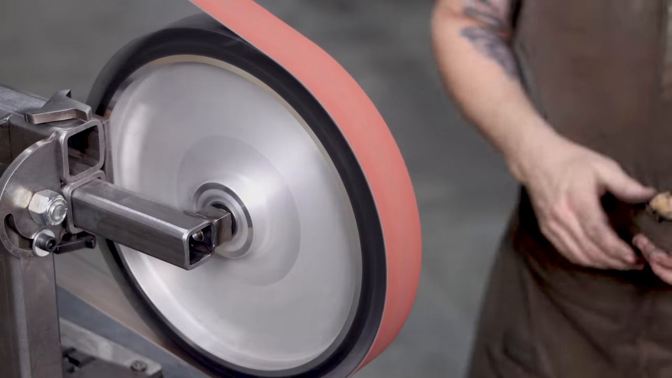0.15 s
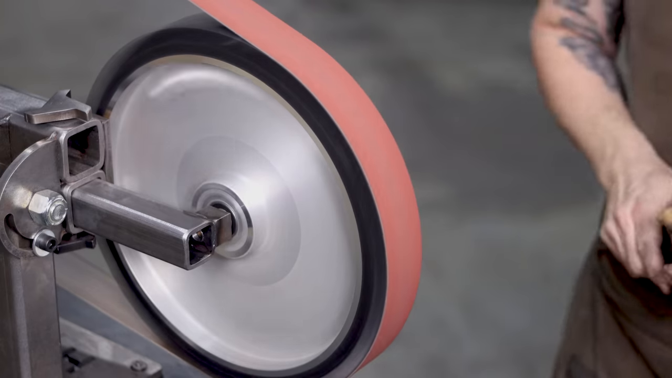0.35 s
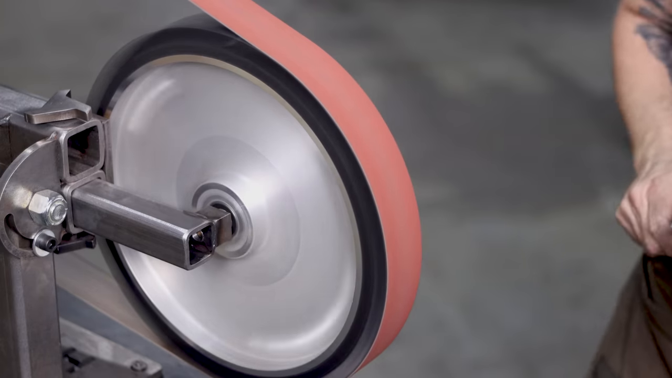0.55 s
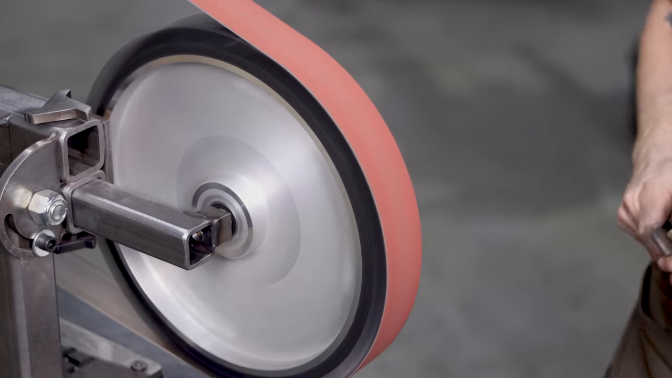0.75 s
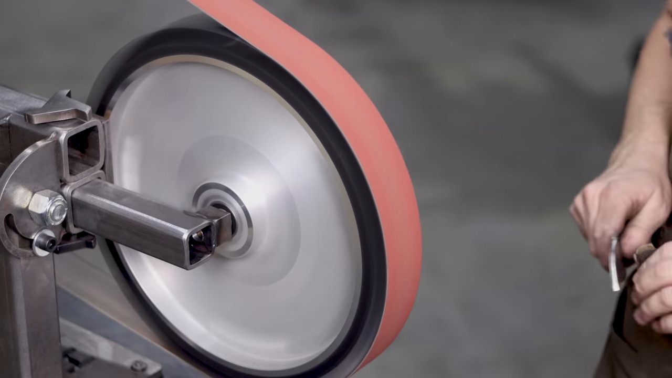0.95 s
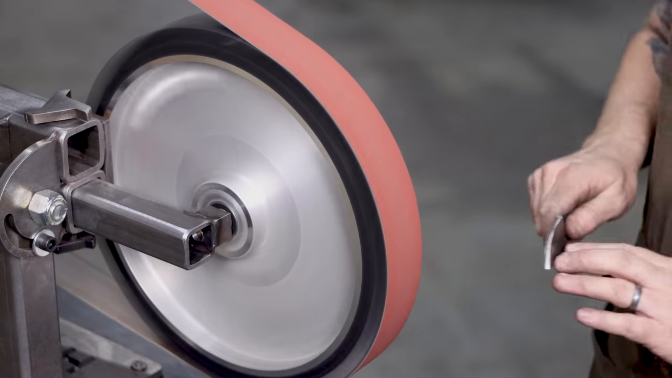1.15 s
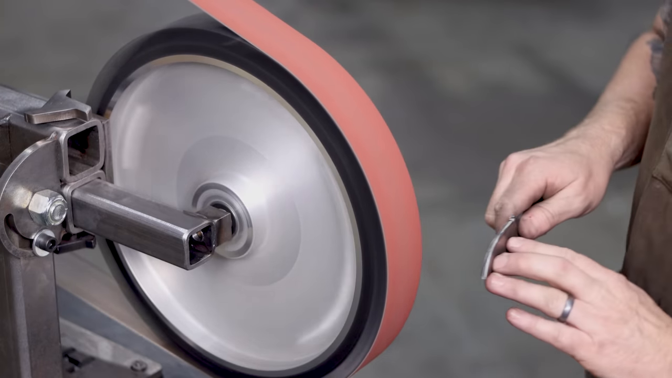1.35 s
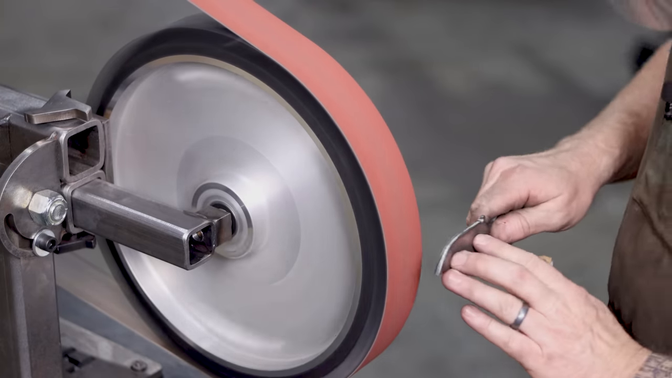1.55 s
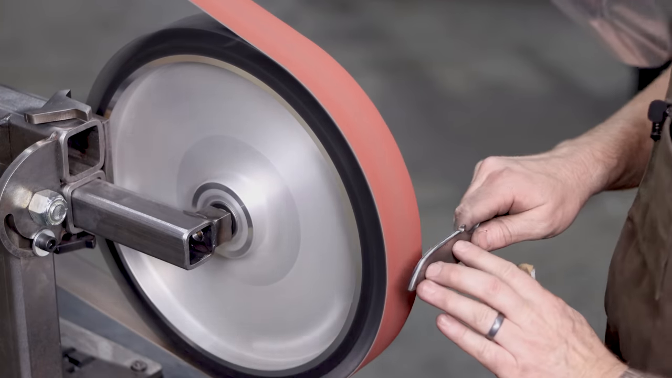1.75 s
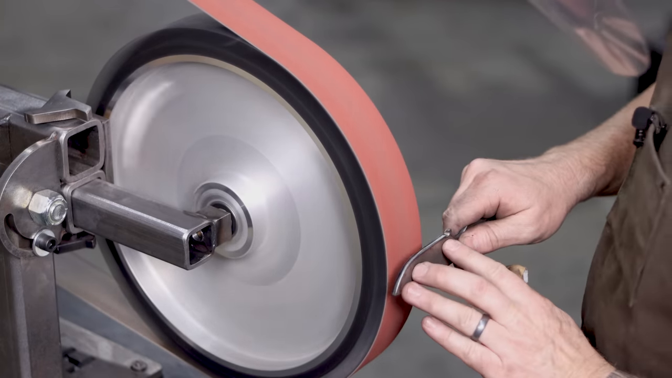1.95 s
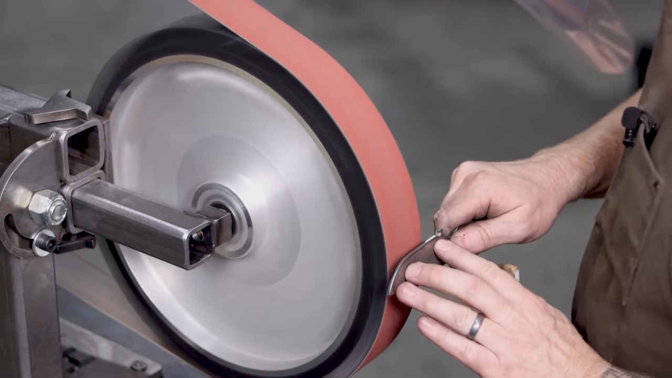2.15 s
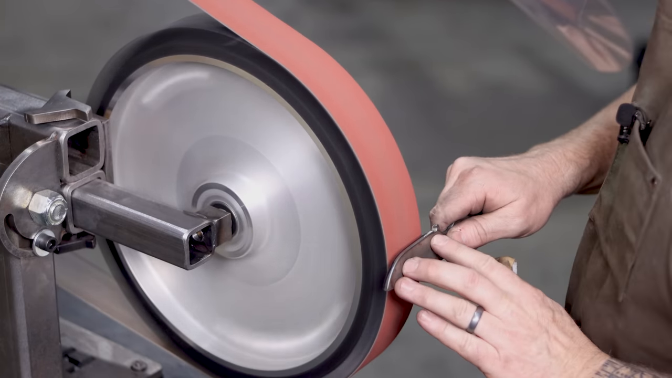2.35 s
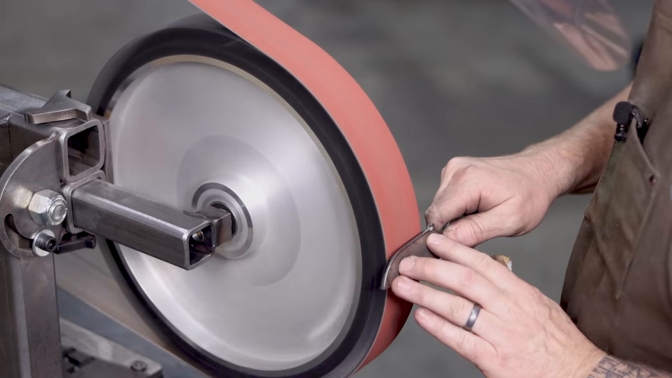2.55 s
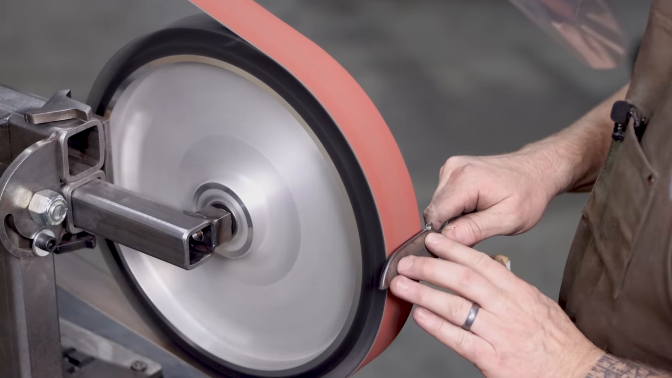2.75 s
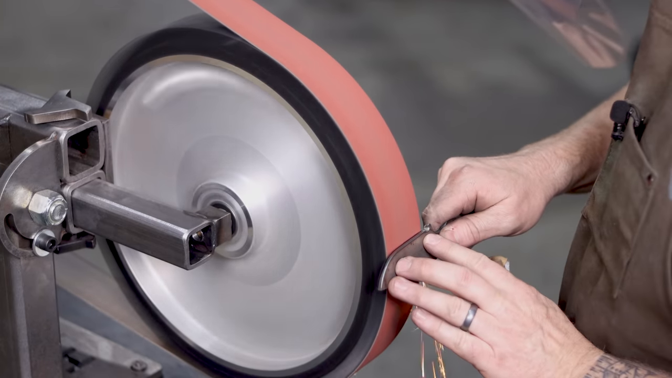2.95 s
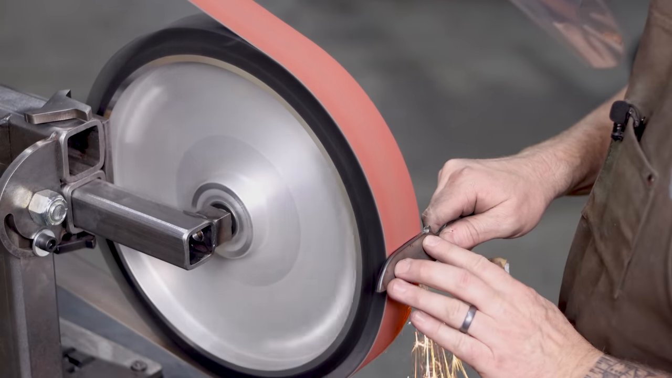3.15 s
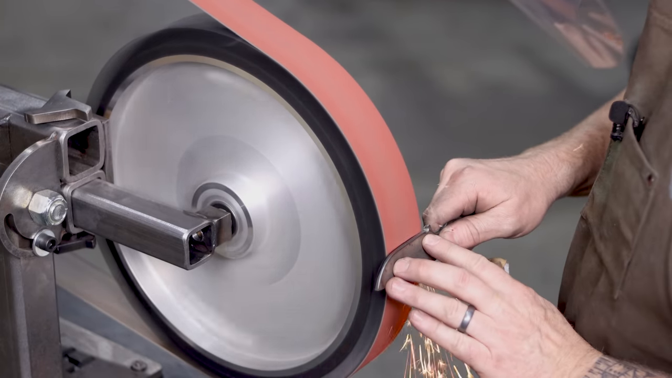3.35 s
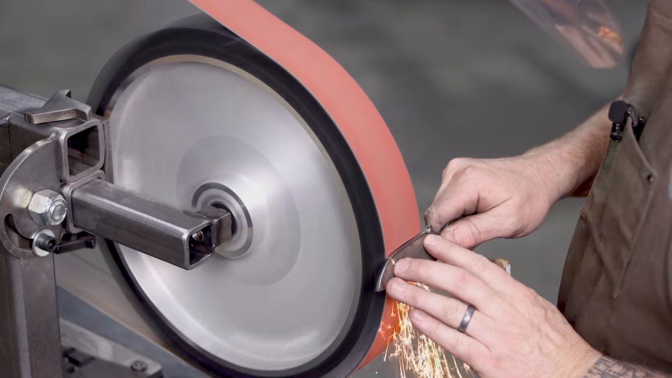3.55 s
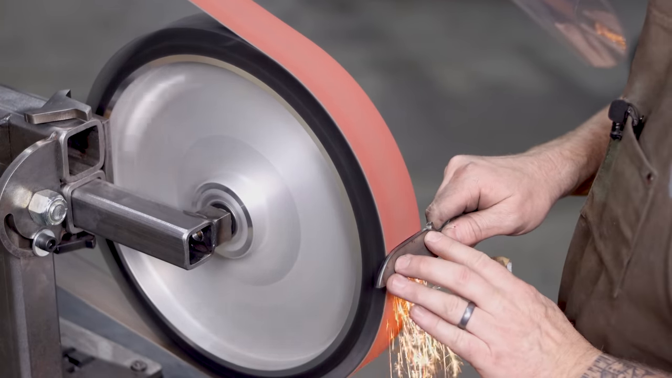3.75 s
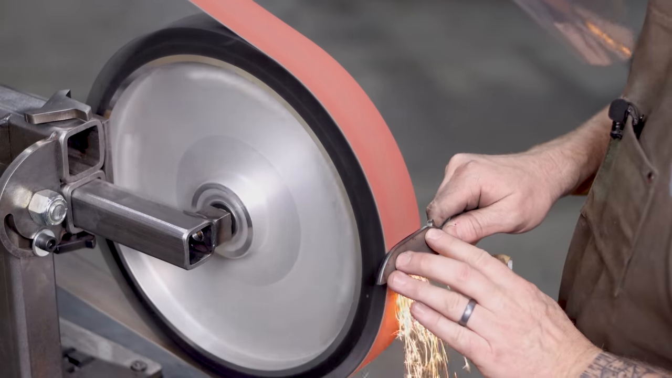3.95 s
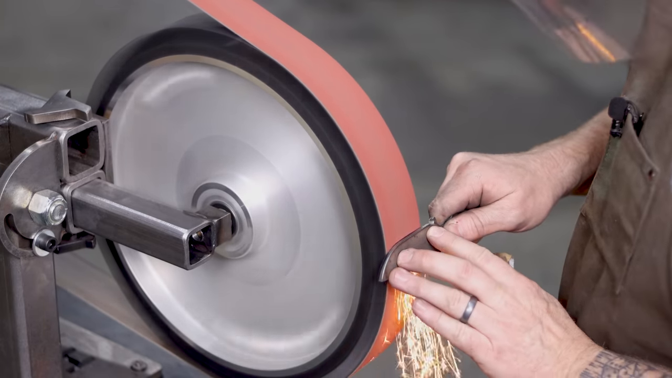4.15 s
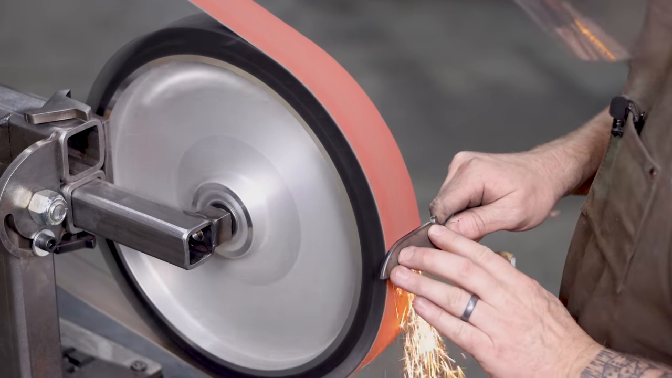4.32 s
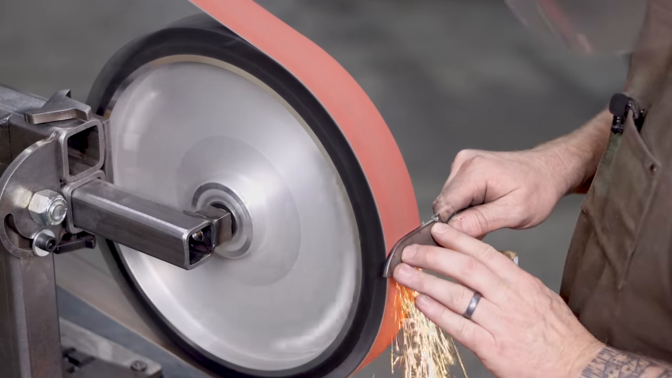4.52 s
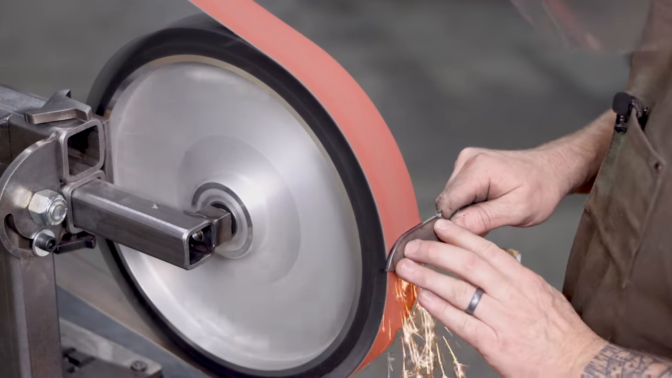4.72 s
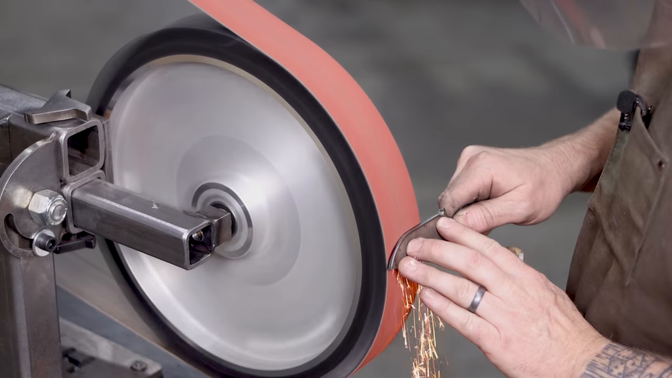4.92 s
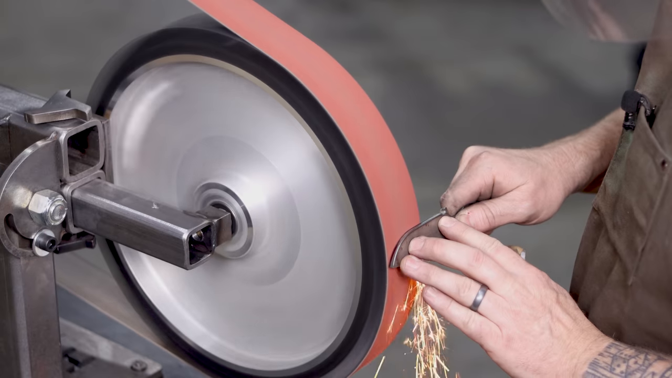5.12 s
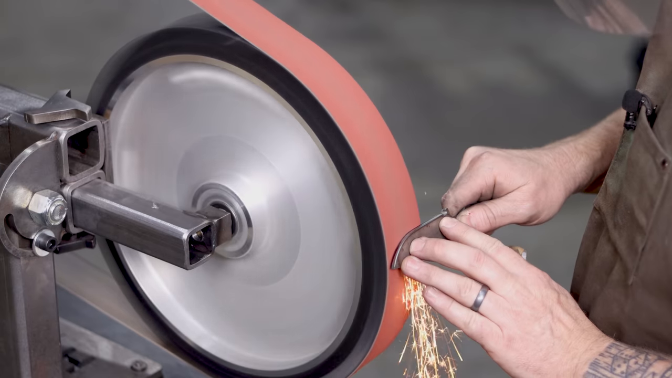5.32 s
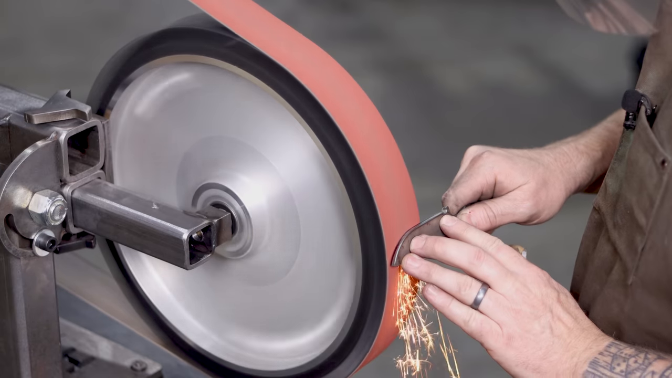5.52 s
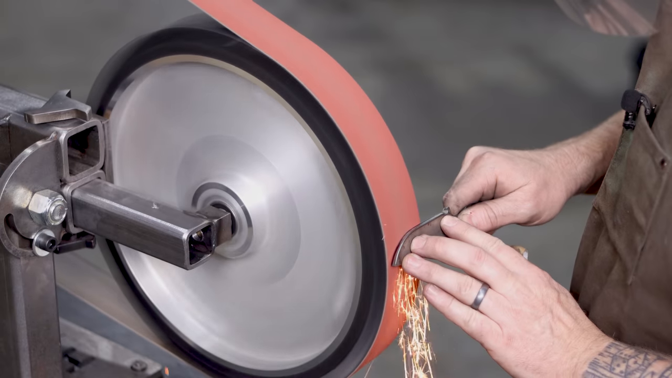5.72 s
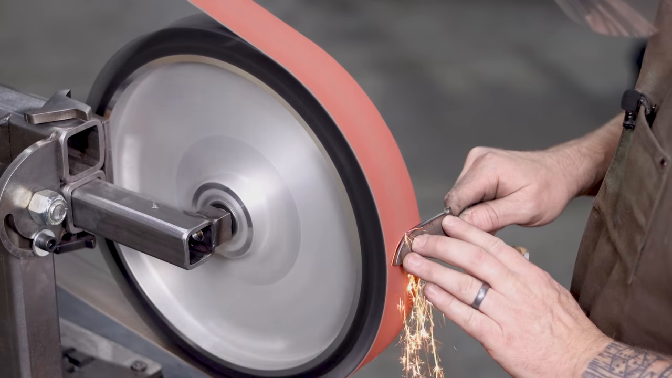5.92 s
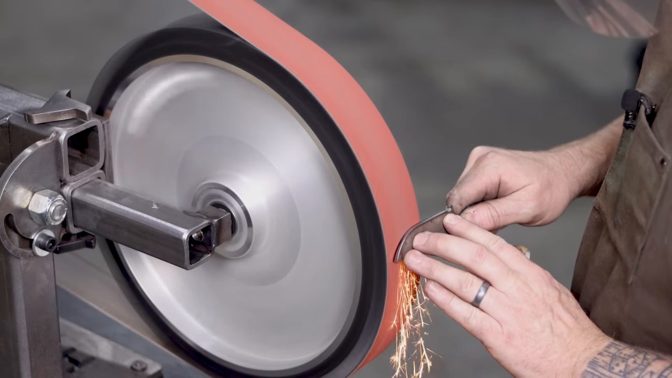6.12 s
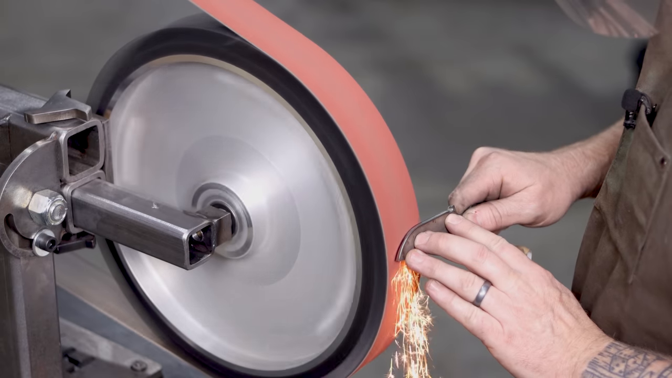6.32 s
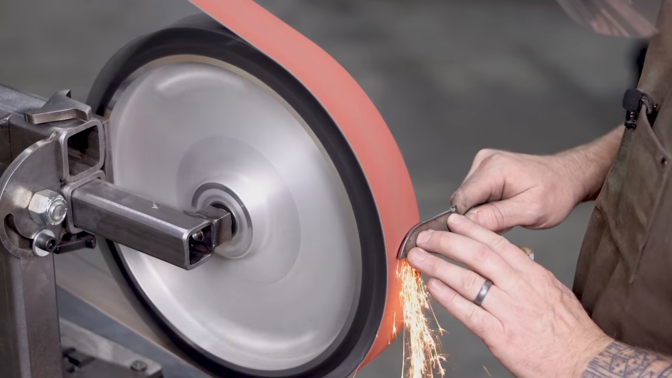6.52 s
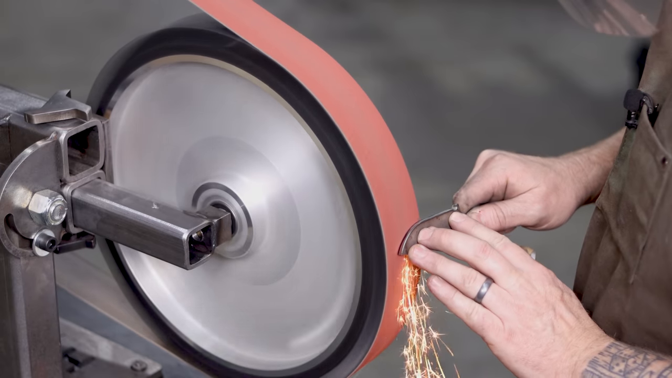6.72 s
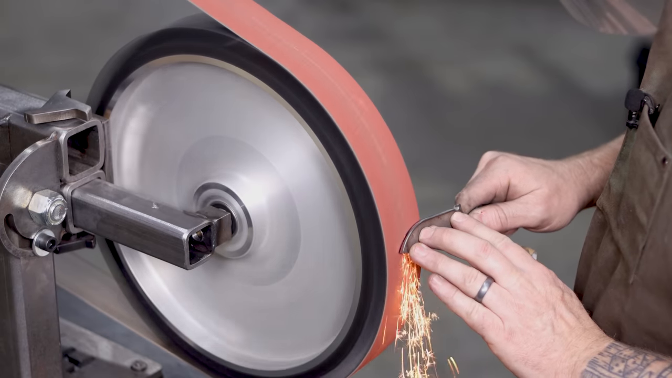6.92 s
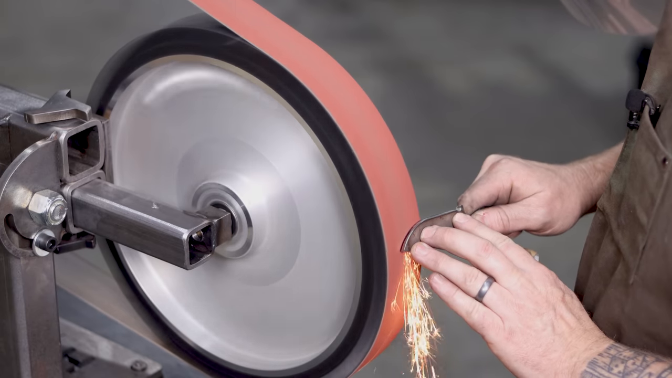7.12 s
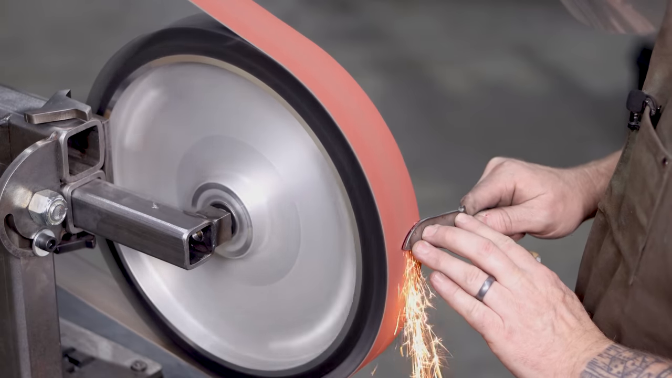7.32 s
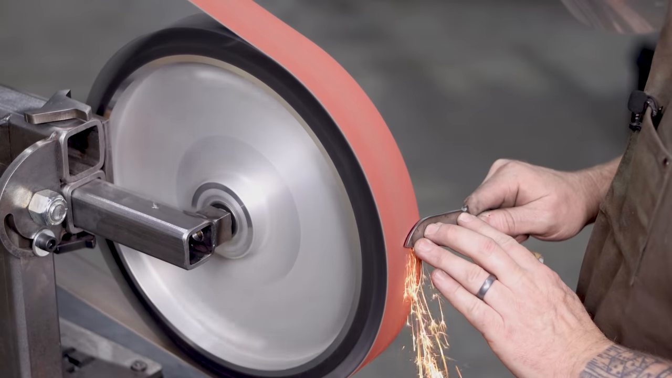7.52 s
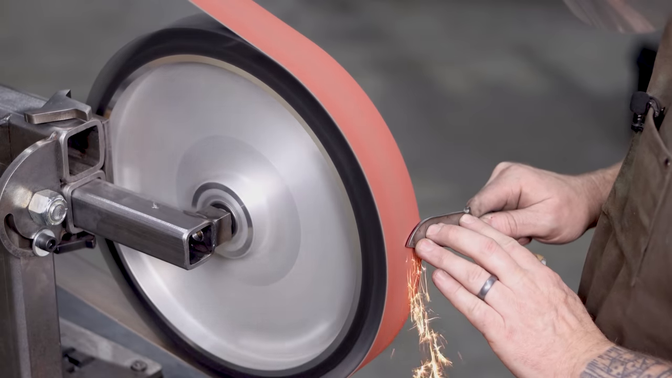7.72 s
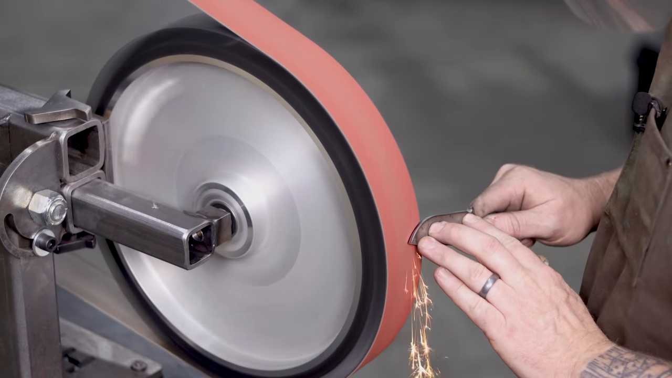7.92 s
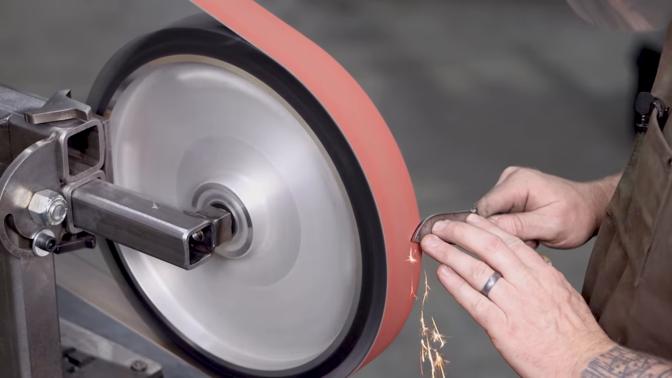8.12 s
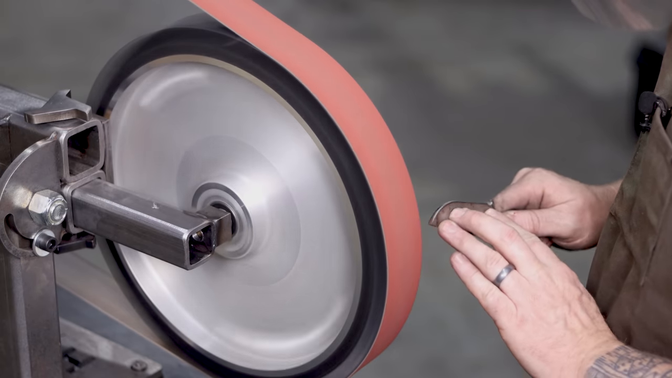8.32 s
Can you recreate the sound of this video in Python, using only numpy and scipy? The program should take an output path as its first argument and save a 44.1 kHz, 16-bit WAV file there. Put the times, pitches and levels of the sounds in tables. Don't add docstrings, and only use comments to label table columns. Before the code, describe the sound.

Close to a spinning grinding belt: steady high whine and gritty hiss, then a harsh metallic rasp surges, eases, sustains and abruptly skips away.

```python
import sys
import numpy as np
from scipy import signal
from scipy.fft import rfft, irfft, next_fast_len
from scipy.io import wavfile
from scipy.ndimage import uniform_filter1d, map_coordinates

SR = 44100
rng = np.random.default_rng(int(sys.argv[2]) if len(sys.argv) > 2 else 0)


def natural_amplitude(level_db):
    exponent = np.asarray(level_db, float) / 20
    return 10 ** exponent


def wrap_up_sound(samples):
    columns = np.atleast_2d(samples).T
    tamed = np.clip(columns, -1, 1)
    steps = np.round(tamed * 32767).astype(np.int16)
    wavfile.write(sys.argv[1], SR, steps)


N = 369116
T = np.arange(N) / SR
GROOVES_WHEEL, GROOVES_BELT = 38, 63.3


def evened(x):
    return x / np.sqrt(np.mean(x ** 2) + 1e-20)


def curves(rows, t=T):
    s, *columns = np.transpose(rows)
    return [np.interp(t, s, c) for c in columns]


def coloured(x, points=None, modes=None):
    size = next_fast_len(N)
    hz = np.fft.rfftfreq(size, 1 / SR)
    if modes:
        power = sum(natural_amplitude(db) ** 2 / (1 + (2 * (hz - f) / width) ** 2) ** 2 for f, width, db in modes)
        gain = np.sqrt(power)
    else:
        f, db = np.transpose(points)
        gain = natural_amplitude(np.interp(np.log(hz + 1), np.log(f + 1), db, -90, -90))
    return evened(irfft(rfft(x, size) * gain, size)[:N])


def slow(hz):
    low_pass = signal.butter(2, hz, fs=SR)
    return evened(signal.lfilter(*low_pass, rng.standard_normal(N)))


def returning(turns, share, size):
    surface = map_coordinates(rng.standard_normal(size), [turns % 1 * size], order=3, mode="grid-wrap")
    return np.sqrt(share) * evened(surface) + np.sqrt(1 - share) * rng.standard_normal(N)


def drifting(z, db):
    patches = rng.standard_normal(z.shape[::-1]).T
    for _ in range(2):
        patches = uniform_filter1d(patches, size=4, axis=0)
        patches = uniform_filter1d(patches, size=70, axis=1)
    return z * natural_amplitude(db * evened(patches - patches.mean(0)))


# (time [s], nearness [0-1])
NEAR = [
    (0, 0),
    (.9, .3),
    (1.8, .75),
    (3, 1),
]


def arriving(far_db, near_db, first, full):
    return np.interp(curves(NEAR)[0], (first, full), (far_db, near_db))


LEAN_S = (3.35, 3.699, 4.6, 5.2)


def leaning():
    return np.interp(T, LEAN_S, (0, 1, 1, 0))


def sidebands(turns, low, low_turn, up, up_turn):
    lower = low * np.exp(2j * np.pi * (low_turn - turns))
    return lower + up * np.exp(2j * np.pi * (up_turn + turns))


UNEVEN = [(.16, .38, .04, .2), (.08, .2, .07, -.45), (.12, 0, .08, 0), (.33, .045, .11, -.03),
          (.36, 0, .3, 0)]
JOINT = [(.2, -.17, .03, .1), (.14, -.04, .27, .36), (.045, .42, .15, -.05)]
# (far [dB], near [dB], first nearness [0-1], full nearness [0-1], per step aside [dB])
WHINE_NEAR = [(-64, -58.7, .2, .7, -1.5), (-64.5, -54.3, .3, .65, 0), (-64.5, -64.3, .1, .9, -2),
              (-58.5, -46.2, .08, .3, -2.3)]
# (leaning [dB], belly [dB], curve [dB], tip [dB])
WHINE_TOUCH = [(-5, -1, 0, -3.5), (-3, -2.5, -10, 13), (-3, -.5, -2.5, -1), (-2.5, -1, -.5, -5)]
# (time [s], stance [0 behind, 1 aside, 2 leaning in])
STANCE = [
    (0, 0),
    (.3, 0.48),
    (.8, 0.87),
    (1.5, 1.14),
    (1.9, 0.25),
]
# (time [s], place [0 heel, 1 belly, 2 curve, 3 tip])
TRAVEL = [
    (3.7, 0),
    (4.35, 1),
    (5.1, 1.34),
    (5.85, 0.9),
    (6.2, 1.68),
    (7.35, 2),
    (7.8, 2.5),
    (8.3, 2.5),
]
FIFTH_DB = -17


def whine(grooves):
    aside, place = curves(STANCE)[0], curves(TRAVEL)[0]
    levels_db = []
    for (*near, aside_db), (lean_db, *place_dbs) in zip(WHINE_NEAR, WHINE_TOUCH):
        touch_db = lean_db * leaning() + np.interp(place, range(4), (0, *place_dbs))
        levels_db.append(arriving(*near) + aside_db * aside + touch_db)
    levels_db.append(levels_db[3] + FIFTH_DB)
    joint = sum(sidebands(lap * grooves / GROOVES_BELT, *row) for lap, row in enumerate(JOINT, 1))
    out = np.zeros(N)
    for k, (db, row) in enumerate(zip(levels_db, UNEVEN), 1):
        joint_share = (k / 4) ** 1.4
        throb = 1 + sidebands(grooves / GROOVES_WHEEL, *row) + joint_share * joint
        waver = natural_amplitude(0.51 * slow(38)) * np.exp(.15j * slow(30))
        tone = np.exp(2j * np.pi * (k * grooves + rng.random()))
        out += np.sqrt(2) * natural_amplitude(db) * (throb * waver * tone).real
    return out


# (frequency [Hz], density [dB per Hz])
HISS = [
    [(1940, -37), (3300, -9), (3910, -8), (5710, -7), (6210, -7.5), (6720, -4), (7410, -6.5), (8900, -11.5),
     (14100, -18.5), (15700, -19)],
    [(1940, -42), (3300, -11.5), (3830, -13.5), (4880, -5.5), (5180, -9.5), (5600, -6), (6050, -6.5),
     (7410, -2.5), (8560, -7.5), (9250, -10.5), (10700, -18.5), (12400, -15), (15700, -23)],
    [(1940, -55), (3300, -34), (3640, -6), (4070, -8), (4430, -4), (5860, -7), (6340, -8), (6850, 2.5),
     (7410, -14), (8610, -3), (9880, -21), (11200, -6), (15700, -14)],
]


def hiss(grit):
    stance = curves(STANCE)[0]
    sound = sum(np.clip(1 - abs(stance - k), 0, 1) * coloured(grit, points) for k, points in enumerate(HISS))
    z = signal.stft(sound, nperseg=512, noverlap=384)[2]
    return signal.istft(drifting(z, 1.3), nperseg=512, noverlap=384)[1][:N]


# (frequency [Hz], width [Hz], level [dB])
WHEEL = [(1244, 140, -15.5), (2368, 140, -8), (2530, 32, 0), (2663, 68, -7.5), (2716, 87, -8),
         (2980, 480, -13.5)]
RING_NEAR = (-11.5, -1, 0, 1.24)


def wheel_ring(grooves, grit):
    turns = grooves / GROOVES_WHEEL
    rim = returning(turns, 0.39, size=2735) + 0.28 * grit
    pulse = 1 + 0.26 * np.cos(2 * np.pi * (turns - .02))
    return natural_amplitude(arriving(*RING_NEAR)) * pulse * coloured(rim, modes=WHEEL)


HISS_DB, HISS_ASIDE_DB, HISS_NEAR_DB = -50, 3, 1.97


def belt(grooves):
    level_db = HISS_DB + HISS_ASIDE_DB * curves(STANCE)[0] + HISS_NEAR_DB * curves(NEAR)[0]
    grit = returning(grooves / GROOVES_BELT, .3, size=4555)
    grit *= 1 + .08 * np.cos(2 * np.pi * grooves)
    return natural_amplitude(level_db) * (hiss(grit) + wheel_ring(grooves, grit))


# (frequency [Hz], density [dB per Hz])
SHOP = [(15, -25), (32, -22), (48, -33), (75, -0.5), (100, -5), (135, -18.5), (200, -9), (350, -7.5),
        (500, -4.5), (700, -10), (1000, -6.5), (1300, -6.5), (1600, -9.5), (2100, -5), (2600, -10)]
# (frequency [Hz], level [dB])
HUMS = [(64.6, -80), (172.3, -79), (317.6, -77.5), (393.0, -78.5), (473.7, -78)]
# (frequency [Hz], density [dB per Hz])
DRAUGHT = [(12, 6.5), (30, -6.5), (60, -4.5), (120, -10.5), (250, -12), (400, -11.5)]
SHOP_DB = -59
DRAUGHT_NEAR = (-82.5, -64.5, -0.14, 1)


def shop():
    rumble = natural_amplitude(SHOP_DB) * coloured(rng.standard_normal(N), SHOP)
    hums = sum(np.sqrt(2) * natural_amplitude(db + 1.4 * slow(2.7)) * np.sin(2 * np.pi * hz * T) for hz, db in HUMS)
    draught = coloured(rng.standard_normal(N), DRAUGHT) * natural_amplitude(1.7 * slow(10))
    return rumble + hums + natural_amplitude(arriving(*DRAUGHT_NEAR)) * evened(draught)


BITE_DB, BEAT_TOP_HZ = 1.9, 9500
SKIP_HZ, SKIP_S, SKIP_DB = 118, 8.333, 6


def scrape(beat, lift):
    bites = natural_amplitude(BITE_DB * np.minimum(rng.exponential(1, N), 5)) * rng.standard_normal(N)
    low_pass = signal.butter(4, BEAT_TOP_HZ, fs=SR, output="sos")
    beaten = signal.sosfilt(low_pass, bites * (beat - 1))
    skips = natural_amplitude(SKIP_DB * lift * np.cos(2 * np.pi * SKIP_HZ * (T - SKIP_S)))
    force = (bites + beaten) * skips * natural_amplitude(1.95 * slow(373))
    return force / np.sqrt(uniform_filter1d(force ** 2, size=8000))


BLADE_HZ = [2220, 2435, 3070, 3480, 4100, 4770, 5200, 5650, 6150, 6620, 7100, 7770, 8550, 9500, 10250,
            11300, 12100, 12700, 13750, 14300, 14700, 15450]
# (width [Hz], heel [dB], belly [dB], curve [dB], tip [dB])
BLADE = [(370, -11, -10, -15, -10.5), (211, -7, -2.5, -2.5, -0.5), (372, -11.5, -6.5, -7, -3.5),
         (420, -15, -8, -9, -14), (450, -18, -12.5, -12.5, -21), (400, -7.5, -3.5, -8.5, 3),
         (500, -3.5, -7.5, -10.5, 0), (480, -2.5, -20, -23, -10), (500, -8, -29, -12, -4),
         (450, -8, -0.5, -9.5, -9), (460, -2, 1, 1.5, -3), (600, -0.5, -5, -6.5, -8),
         (910, -6.5, -4, -7, -14), (660, -11.5, -8.5, -12, -3), (700, -11.5, -16.5, -7.5, -5),
         (650, -16, -16, -21, -13), (500, -12, -16, -18, -5), (600, -11.5, -10.5, -11.5, -11),
         (550, -16, -12.5, -12, -14), (500, -14, -16, -22, -20), (550, -13, -21, -11.5, -12),
         (700, -13, -13, -16, -11)]


def blade_modes(force, grooves):
    hz, t, z = signal.stft(force, SR, nperseg=512, noverlap=384)
    hz = hz[:, None]
    place = curves(TRAVEL, t)[0]
    power = 0
    for f, (width, *dbs) in zip(BLADE_HZ, BLADE):
        resonance = 1 / (1 + (2 * (hz - f) / width) ** 2) ** 1.46
        power = power + natural_amplitude(np.interp(place, range(4), dbs)) ** 2 * resonance
    turns = np.interp(t, T, grooves) / GROOVES_WHEEL
    flutter = 1 + 0.13 * (hz < 3800) * np.cos(2 * np.pi * (turns + 0.14))
    z = drifting(z, .9) * flutter * np.sqrt(power / power.mean(0))
    return signal.istft(z, SR, nperseg=512, noverlap=384)[1][:N]


# (time [s], level [dB])
PASS = [
    (3.0, -43),
    (3.04, -37),
    (3.63, -31),
    (4.73, -31),
    (5.36, -33),
    (7.35, -33),
    (8.25, -35),
    (8.33, -39),
    (8.37, -56),
]
# (frequency [Hz], density [dB per Hz])
ROAR = [(880, -70), (1500, -18), (1990, -20.5), (2500, -22), (2760, -9), (4010, -8.5), (4740, -2),
        (7010, -0.5), (11400, -21.5), (12600, -22), (15700, -25)]
# (frequency [Hz], density [dB per Hz])
THRUM = [(12, -44), (20, -13), (551, -15), (608, -11), (685, -15.5), (1130, -13.5), (1220, -18),
         (1610, -47), (2300, -2.5), (2990, -15), (5060, -120)]
LIFT_S = (8.28, 8.34)
ROAR_DB, ROAR_LEAN_DB, ROAR_LIFT_DB = -14.5, 16.5, 4
THRUM_DB, THRUM_LEAN_DB, THRUM_FADE_DB_PER_S, THRUM_LIFT_DB = -23.5, 4, -0.1, 9
LIGHT_DB, LIGHT_RUNOUT_PER_DB = -33.5, .05
HARD_DB, HARD_GAIN_DB_PER_DB = -36.5, .7


def blade(grooves):
    pressure_db, lift = curves(PASS)[0], np.interp(T, LIFT_S, (0, 1))
    roar = natural_amplitude(ROAR_DB + ROAR_LEAN_DB * leaning() + ROAR_LIFT_DB * lift)
    fade_db = THRUM_FADE_DB_PER_S * (T - LEAN_S[3])
    thrum_db = THRUM_DB + THRUM_LEAN_DB * leaning() + fade_db + THRUM_LIFT_DB * lift
    depth = np.interp(curves(TRAVEL)[0], range(4), (.1, .3, .42, .28))
    beat = np.exp(depth * np.cos(2 * np.pi * grooves))
    sound = blade_modes(scrape(beat, lift), grooves)
    sound = sound + roar * coloured(beat * rng.standard_normal(N), ROAR)
    sound /= np.sqrt(1 + roar ** 2)
    sound += natural_amplitude(thrum_db) * coloured(rng.standard_normal(N), THRUM)
    light = np.clip(LIGHT_RUNOUT_PER_DB * (LIGHT_DB - pressure_db), 0, .3) * (1 - lift)
    runout = 1 + (0.1 + light) * np.cos(2 * np.pi * (grooves / GROOVES_WHEEL + 0.29))
    hard_db = HARD_GAIN_DB_PER_DB * np.maximum(pressure_db - HARD_DB, 0)
    touching = np.clip((T - 3.018) / 0.013, 0, 1)
    return natural_amplitude(hard_db + pressure_db + 0.54 * slow(21)) * runout * touching * sound


# (time [s], rate [Hz])
SPEED = [(0, 611.5), (.4, 612.2), (.9, 613.6), (1.5, 613.1), (2.3, 612.7), (3, 612.5), (3.5, 611),
         (4.8, 609.8), (6, 610), (7, 610.2), (8.37, 611)]


def scene():
    grooves = np.cumsum(curves(SPEED)[0]) / SR
    return np.tile(whine(grooves) + belt(grooves) + shop() + blade(grooves), (2, 1))


def top_cut(x):
    return signal.sosfilt(signal.butter(12, 16990, fs=SR, output="sos"), x)


CLIP_DB, KNEE, EDGE_HZ = -26.4, 7, 15750


def record(dry):
    clipped = dry / (1 + abs(dry / natural_amplitude(CLIP_DB)) ** KNEE) ** (1 / KNEE)
    edge = signal.firwin(2047, EDGE_HZ, window=("kaiser", 11), fs=SR)
    return top_cut(signal.oaconvolve(clipped, edge[None], "same"))


dry = scene()
out = record(dry)
wrap_up_sound(out)
```